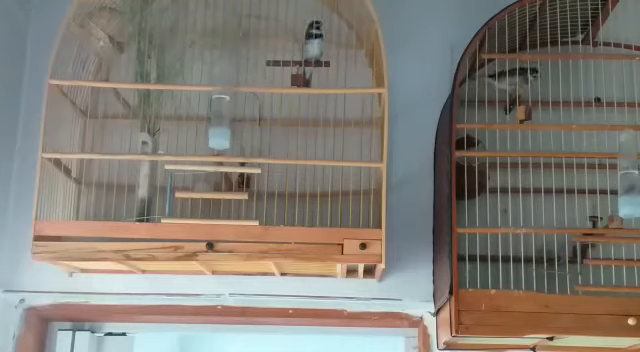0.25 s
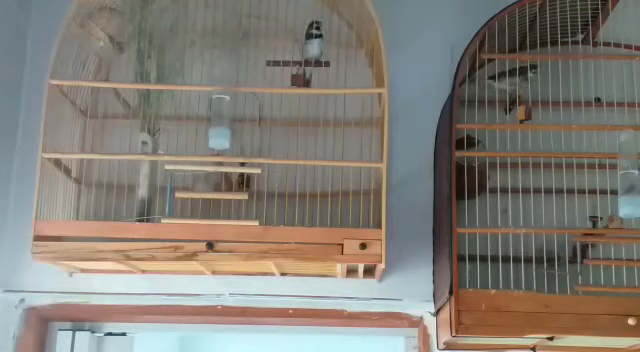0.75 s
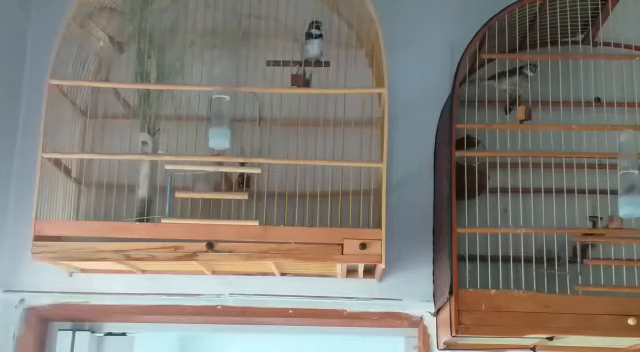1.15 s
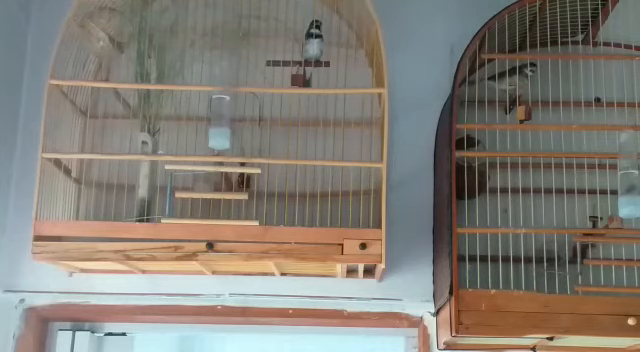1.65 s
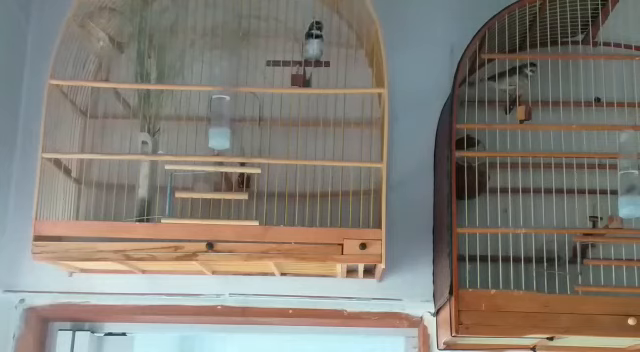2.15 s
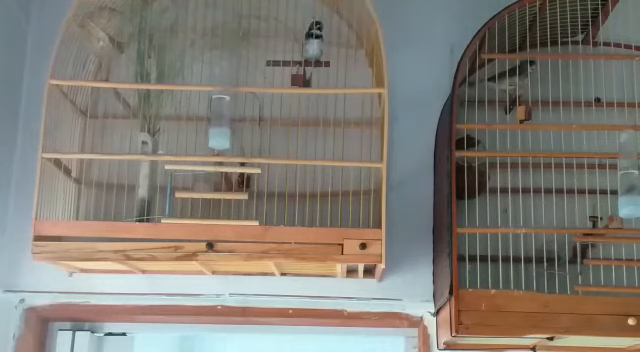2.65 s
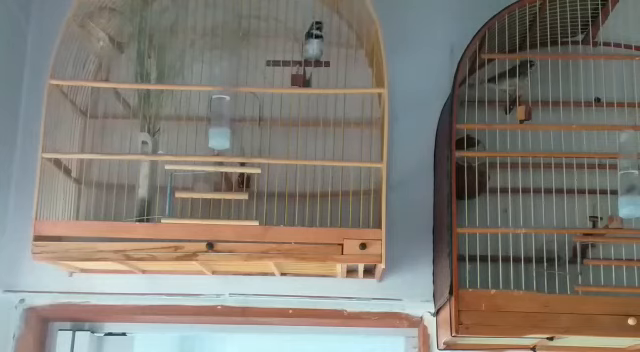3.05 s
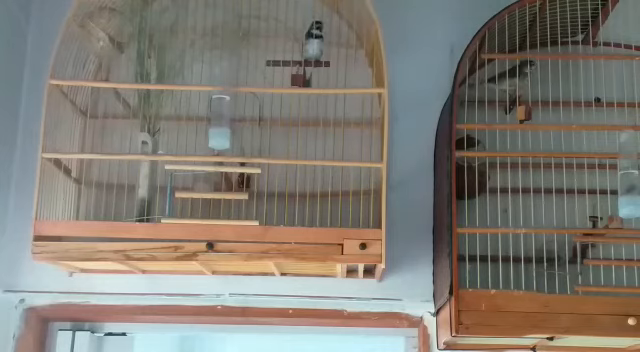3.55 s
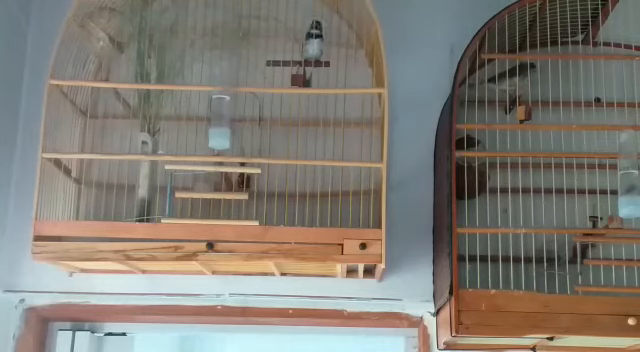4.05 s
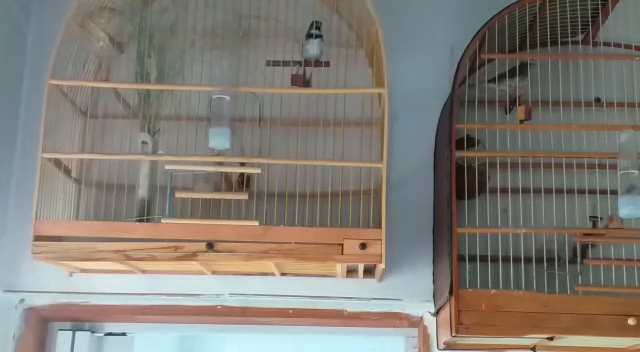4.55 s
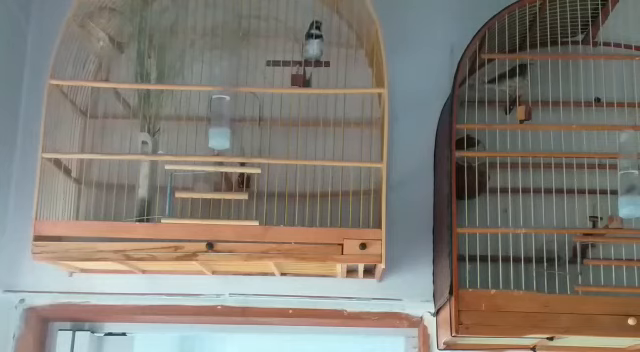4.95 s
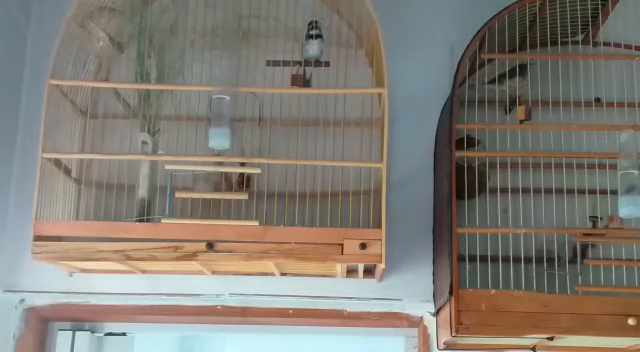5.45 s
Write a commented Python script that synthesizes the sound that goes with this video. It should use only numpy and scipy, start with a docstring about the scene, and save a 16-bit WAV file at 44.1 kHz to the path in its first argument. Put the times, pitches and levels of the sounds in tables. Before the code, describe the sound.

Brief upward chirps from a nearby small bird ring off bare walls, while a fainter second bird calls early on above quiet room hum and hiss.

```python
"""A caged seedeater sings six short, rising whistles in a hard-walled room: gliding near-sines with
weak overtones, noise ticks and cracks, and two hoarse stretches. Another bird, farther off, gives softer
rising notes and two falling slurs, one a wide sweep, heard mostly through diffuse reverberation.
Under them lie a hum of wavering low tones, the faint rush of the room and microphone hiss (shaped noise)."""
import sys
import numpy as np
from scipy import signal
from scipy.fft import rfft, irfft
from scipy.io import wavfile

SR = 44100
rng = np.random.default_rng(int(sys.argv[2]) if len(sys.argv) > 2 else 0)


def materialize(psi):
    """Save the field psi as 16-bit PCM at rate SR to the path in sys.argv[1].

    A 1-D psi becomes a single channel; in a 2-D psi each row is a channel.
    """
    bounded = np.clip(np.atleast_2d(psi).T, -1, 1)
    quanta = np.round(bounded * 32767).astype(np.int16)
    wavfile.write(sys.argv[1], SR, quanta)


N = 251400
TIME = np.arange(N) / SR

# near bird's rising notes, levels before the room mix: (start [s], low hold [s], climb [s], top hold [s],
# extra jump before the top [s], none if no longer than one jump, start [Hz], foot of climb [Hz], top [Hz],
# bow of climb [1 = straight], top level [dB], climb above top [dB], fade on the top [dB], overtones [dB])
NEAR_NOTES = [ (1.106, 0.0033, .047, 0.051, 0.00081, 3410, 3400, 4050, 0.57, -24, 0, -3, -4),
              (1.457, .002, .117, .046, .02, 3000, 2957, 4342, .66, -22, 0.5, -6, 1.5),
              (3.342, .032, 0.042, 0.035, 0, 3297, 3280, 3890, 0.85, -20.5, -4, .5, -0.5),
              (3.664, .027, 0.028, 0.017, 0.01, 2982, 2830, 3435, 0.98, -27, 6.5, -4.5, 6.5),
              (4.789, .015, .091, 0.022, .036, 3500, 3497, 4280, 0.58, -24.5, 4, 1, -.5),
              (5.231, .055, 0.078, 0.041, 0.023, 3090, 3023, 4347, 0.46, -21, -0.5, -4.5, -0.5)]


def from_db(db):
    """Decibels to amplitude gain."""
    return 10 ** (np.asarray(db) / 20)


def rms_one(x):
    """Scale to unit rms."""
    return x / np.sqrt(np.mean(x ** 2) + 1e-20)


def at_hz(points, hz):
    """Interpolate a table on a log-frequency axis."""
    known_hz, values = np.transpose(points)
    return np.interp(np.log(hz + 1e-9), np.log(known_hz), values)


def drift(rate_hz):
    """Smooth random wander of unit rms: white noise low-passed around rate_hz."""
    hz = np.arange(N // 2 + 1) * SR / N
    spectrum = rfft(rng.standard_normal(N)) / (1 + (hz / rate_hz) ** 2) ** 2
    return rms_one(irfft(spectrum, N))


def coloured_noise(spectrum):
    """Steady noise of unit rms with the given spectrum, falling away beyond its ends."""
    hz = np.arange(1, N // 2 + 2) * SR / N
    low_skirt = np.minimum(1, hz / spectrum[0][0]) ** 4
    high_skirt = np.minimum(1, spectrum[-1][0] / hz) ** 4
    gain = from_db(at_hz(spectrum, hz)) * low_skirt * high_skirt
    return rms_one(irfft(rfft(rng.standard_normal(N)) * gain, N))


def band_noise(length, low_hz, high_hz):
    """White noise through a causal band-pass."""
    edges_hz = [low_hz, min(high_hz, SR / 2 - 1000)]
    sos = signal.butter(2, edges_hz, "band", fs=SR, output="sos")
    return signal.sosfilt(sos, rng.standard_normal(length))


def appliance_hum():
    """Mains and motor hum: low steady tones, each wavering slowly in amplitude and phase."""
    # close pair near 120 Hz beats: (frequency [Hz], steady level [dB rms], waver share [ratio])
    hum_tones = [(59.4, -60, .14), (120.9, -63.5, 0.197), (118.5, -60, 0.096), (184.1, -50, .05),
                 (654, -71.5, .2)]
    out = np.zeros(N)
    for hz, db, waver in hum_tones:
        phase = 2 * np.pi * hz * TIME
        in_phase = (1 + waver * drift(3)) * np.sin(phase)
        quadrature = waver * drift(3) * np.cos(phase)
        out += np.sqrt(2) * from_db(db) * (in_phase + quadrature)
    return out


def room_rush():
    """Faint broadband rush of the room, mostly low-frequency noise."""
    # relative spectrum: (frequency [Hz], density [dB per Hz])
    rush_spectrum = [(45, -25), (58, -9), (110, -7.5), (165, -7.5), (245, 1), (320, -4), (450, -11),
                     (510, -7.5), (610, -13), (800, -14.5), (1050, -20), (1250, -18.5), (1800, -21.5),
                     (2300, -35)]
    return from_db(-51.5) * coloured_noise(rush_spectrum)


def microphone_hiss():
    """Steady treble noise of the microphone."""
    # relative spectrum: (frequency [Hz], density [dB per Hz])
    hiss_spectrum = [(1900, -29), (2400, -4), (3300, -0.5), (4400, 0), (5200, 2), (6900, -1), (8150, 5.5),
                     (9200, -9), (10150, -2.5), (10700, -5.5), (14300, -7), (15700, -6.5)]
    return from_db(-61.5) * coloured_noise(hiss_spectrum)


def whistle(notes, jitter, flutter_db, attack_s, release_s):
    """The syrinx: a near-sine gliding through each note, slightly unsteady, overtones coloured by the throat."""
    # overtone gain of throat and beak re the whistle: (frequency [Hz], gain [dB])
    throat_gain = [(5600, -13), (6500, -13), (7100, -30), (7700, -26), (8700, -32.5), (9500, -39.5),
                   (11400, -34), (12100, -35.5), (12900, -25), (13300, -33.5), (14000, -42.5), (15600, -43)]
    out = np.zeros(N)
    wobble = 1 + jitter * drift(220)
    flutter = flutter_db * drift(130)
    for note in notes:
        s, hz, level_db, bright_db = np.transpose(note)
        end_s = s[-1] + release_s
        span = (TIME > s[0]) & (TIME < end_s)
        t = TIME[span]
        pitch_hz = np.interp(t, s, hz) * wobble[span]
        phase = 2 * np.pi * np.cumsum(pitch_hz) / SR
        overtones = 0
        for k in (2, 3, 4):
            below_nyquist = k * pitch_hz < SR / 2
            overtones = overtones + from_db(at_hz(throat_gain, k * pitch_hz)) * below_nyquist * np.sin(k * phase)
        tone = np.sin(phase) + from_db(np.interp(t, s, bright_db)) * overtones
        gate = np.clip((t - s[0]) / attack_s, 0, 1) * np.clip((end_s - t) / release_s, 0, 1)
        level = from_db(np.interp(t, s, level_db) + flutter[span])
        out[span] += np.sqrt(2) * tone * np.sin(gate * np.pi / 2) ** 2 * level
    return out


def rising_note(row):
    """Low hold, climb with a jump or two, held top, quick close, as (time [s], [Hz], [dB], overtones [dB])."""
    (start, low_s, climb_s, top_s, early_jump_s, start_hz, foot_hz, top_hz,
     bow, db, climb_db, fade_db, bright_db) = row
    jump_hz, jump_s = 200.7, 0.007
    drop_hz, drop_s, drop_db = 525, 0.009, 22   # closing fall in pitch and level
    sag_hz_per_s = 1350   # sink of the held top
    full_voice_hz, opening_hz, low_voice_db = 3400, 70, 12   # voice is soft below full_voice_hz
    accent_db, accent_s = 3.5, 0.008   # surge as the voice opens and after each jump
    swell_db, swell_s = 21, 0.024
    climb_dull_db, close_bright_db = 1.5, 8   # overtones dull in the open climb, outlast the whistle

    stages = np.cumsum([0, low_s, climb_s, jump_s, top_s, drop_s])
    t = np.linspace(0, stages[-1], 300)
    # progress 0..1 through each stage
    low, climb, arrived, held, close = [np.interp(t, ends, [0, 1]) for ends in zip(stages, stages[1:])]
    jumps = [low_s + climb_s]
    if early_jump_s > jump_s:
        jumps.append(low_s + climb_s - early_jump_s)

    hz = start_hz + (foot_hz - start_hz) * low
    hz = hz + (top_hz - foot_hz - jump_hz * len(jumps)) * climb ** bow
    hz = hz + sum(jump_hz * np.clip((t - s) / jump_s, 0, 1) for s in jumps)
    hz = hz - sag_hz_per_s * top_s * held - drop_hz * close

    softness = np.clip((full_voice_hz - hz) / opening_hz, 0, 1)
    surges = [t[np.argmax(softness == 0)]] + [s + jump_s for s in jumps]
    accents = [np.interp(t, [s - jump_s / 2, s, s + 2 * accent_s], [0, 1, 0]) for s in surges]
    accent = np.max(accents, axis=0)
    held_back_db = np.maximum(swell_db * np.exp(-t / swell_s), low_voice_db * softness)
    level_db = db + climb_db * (1 - arrived) + accent_db * accent
    level_db = level_db - held_back_db - fade_db * held - drop_db * close
    overtones_db = bright_db - climb_dull_db * (1 - softness) * (1 - arrived) + close_bright_db * close
    return np.column_stack([start + t, hz, level_db, overtones_db])


def falling_slur(row):
    """Even slide down in log pitch, loudest mid-note, as (time [s], [Hz], [dB], overtones [dB])."""
    start, length, from_hz, to_hz, db, bright_db = row
    along = np.linspace(0, 1, 50)
    hz = from_hz * (to_hz / from_hz) ** along
    level_db = db - 10.5 * (2 * along - 1) ** 2   # ends 10.5 dB down
    return np.column_stack([start + length * along, hz, level_db, np.full_like(along, bright_db)])


def far_bird():
    """Dry voice of the farther bird: softer rising notes and falling slurs."""
    # rising notes, columns as NEAR_NOTES: (times [s], pitches [Hz], bow [1 = straight], levels [dB])
    answer_notes = [ (0.720, 0.0025, 0.017, .012, 0.0017, 3810, 3840, 4270, 1.5, -65.5, 13, 8, -11),
                    (1.371, .016, .012, 0.066, 0, 3123, 3220, 3422, 1.1, -40.5, -1.5, -3, -21.5),
                    (1.616, .058, .058, .044, 0, 2776, 2990, 3722, 0.655, -35.5, -6, 9, -15),
                    (1.885, .053, .051, .055, 0, 2837, 2950, 3891, 0.7, -36.5, -3, 4.5, -8)]
    # slurs before the room mix: (start [s], length [s], from [Hz], to [Hz], level [dB], overtones [dB])
    slur_rows = [(1.319, 0.071, 4700, 4090, -54, -11.5), (2.115, .143, 6500, 2788, -45, -13)]
    notes = [rising_note(row) for row in answer_notes] + [falling_slur(row) for row in slur_rows]
    return whistle(notes, jitter=0.0017, flutter_db=6.0, attack_s=0.0068, release_s=0.023)


def room(x, build_s, early_share, early_t60, linger):
    """Diffuse ring: dense reflections with a quick early fall, then a frequency-dependent tail."""
    # decay time before the linger factor: (frequency [Hz], t60 [s])
    ring_t60 = [(3000, 0.43), (4200, 0.49), (8000, 0.39), (13000, 0.46)]
    t = TIME[:SR]
    response = np.zeros(SR)
    edges_hz = np.geomspace(2000, 17000, 8)
    for low_hz, high_hz in zip(edges_hz, edges_hz[1:]):
        t60 = linger * at_hz(ring_t60, np.sqrt(low_hz * high_hz))
        fade = from_db(-60 * t / t60) + early_share * from_db(-60 * t / early_t60)
        response += band_noise(SR, low_hz, high_hz) * fade
    response *= 1 - np.exp(-t / build_s)
    return signal.fftconvolve(x, response / np.sqrt(np.sum(response ** 2)))[:N]


def ticks(decay_s, low_hz, high_hz):
    """The voice catches: millisecond noise bursts, faint at note onsets, louder at breaks."""
    # cracks where the voice breaks, before the room mix: (time [s], level [dB])
    voice_cracks = [(1.577, -38.5), (3.724, -36.5), (3.744, -34.5), (4.893, -43), (5.362, -32)]
    catches = [(note[0], -47) for note in NEAR_NOTES] + list(voice_cracks)
    envelope = np.zeros(N)
    for s, db in catches:
        envelope += from_db(db) * (TIME >= s) * np.exp(-np.abs(TIME - s) / decay_s)
    return envelope * rms_one(band_noise(N, low_hz, high_hz))


def near_bird():
    """Dry voice of the near bird: rising whistles with ticks and rasp."""
    notes = [rising_note(row) for row in NEAR_NOTES]
    voice = whistle(notes, jitter=0.0043, flutter_db=3.5, attack_s=0.0024, release_s=0.0068)
    voice = voice + ticks(decay_s=0.0051, low_hz=4060, high_hz=6400)
    return voice + rasp(rate_hz=230, low_hz=4500, high_hz=6360)


def early_echoes(x):
    """Direct sound plus first bounces, divided by the root-sum-square of their gains."""
    # nearby walls and ceiling: (delay [s], gain [ratio])
    bounces = [(.0047, 0.49), (0.0109, 0.6), (0.0246, .25)]
    out = x + sum(gain * np.interp(TIME - delay, TIME, x, left=0) for delay, gain in bounces)
    return out / np.sqrt(1 + sum(gain ** 2 for delay, gain in bounces))


def rasp(rate_hz, low_hz, high_hz):
    """Hoarse hiss beneath a note: band noise pulsing quickly with a wandering phase."""
    # hoarse stretches before the room mix: (start [s], end [s], peak level [dB])
    hoarse_spans = [(3.711, 3.757, -40), (5.253, 5.374, -50)]
    envelope = np.zeros(N)
    for start, end, db in hoarse_spans:
        arch = np.clip(4 * (TIME - start) * (end - TIME) / (end - start) ** 2, 0, 1)
        envelope += from_db(db) * np.sqrt(arch)
    pulses = 1 + np.sin(2 * np.pi * rate_hz * TIME + drift(57))
    return envelope * rms_one(pulses * band_noise(N, low_hz, high_hz))


def scene():
    """Near bird partly direct, far bird mostly through the room, over hum, rush and hiss; one channel."""
    near, far = near_bird(), far_bird()
    near_ring = room(near, build_s=0.004, early_share=0.91, early_t60=0.28, linger=0.99)
    far_ring = room(far, build_s=0.008, early_share=0.2, early_t60=0.12, linger=1.25)
    near_heard = from_db(-1.5) * early_echoes(near) + from_db(-7.0) * near_ring
    far_heard = from_db(-10.5) * far + from_db(-1.0) * far_ring
    background = appliance_hum() + room_rush() + microphone_hiss()
    return (near_heard + far_heard + background)[None, :]


def record(dry):
    """Steep elliptic low-pass at 15.75 kHz."""
    sos = signal.ellip(12, 0.1, 80, 15750, fs=SR, output="sos")   # 0.1 dB ripple, 80 dB stopband
    return signal.sosfilt(sos, dry)


dry = scene()
out = record(dry)
materialize(out)
```